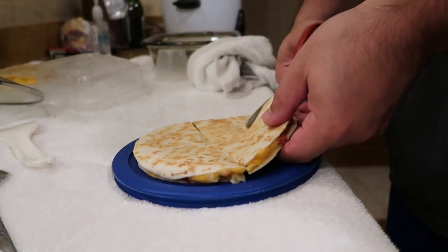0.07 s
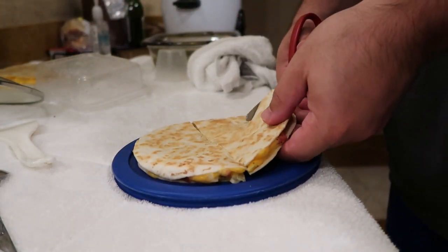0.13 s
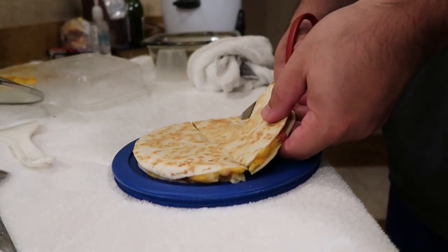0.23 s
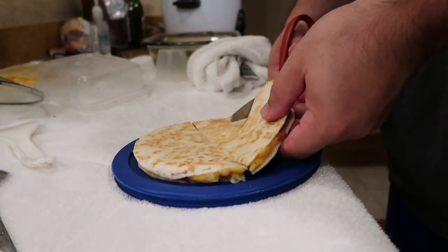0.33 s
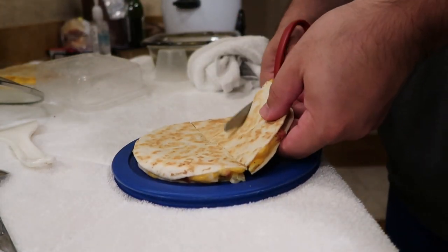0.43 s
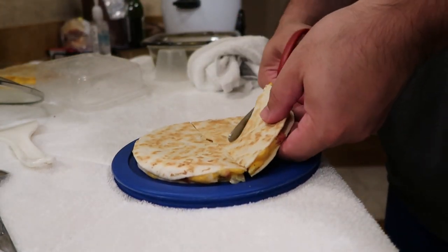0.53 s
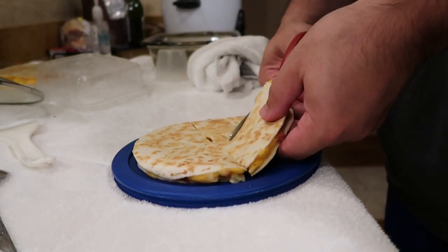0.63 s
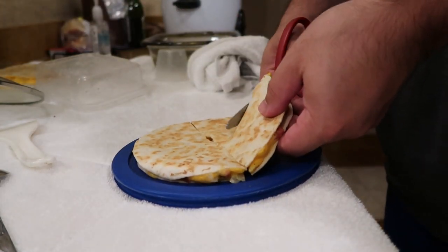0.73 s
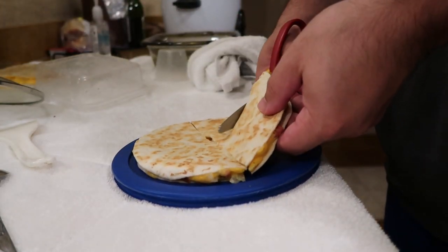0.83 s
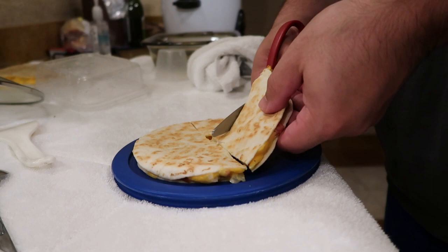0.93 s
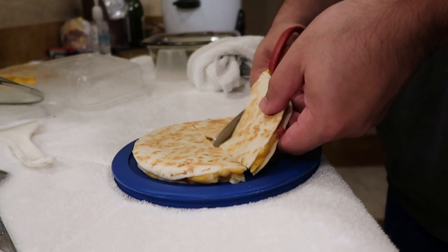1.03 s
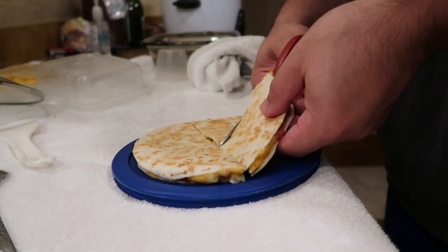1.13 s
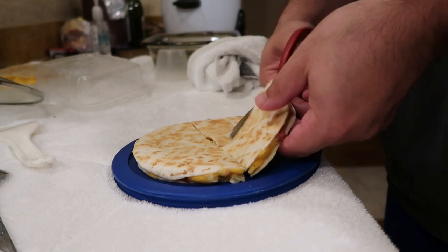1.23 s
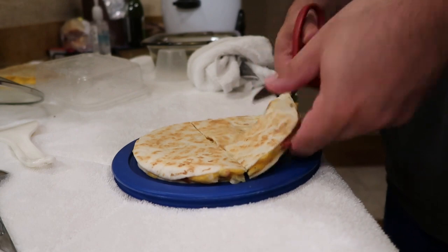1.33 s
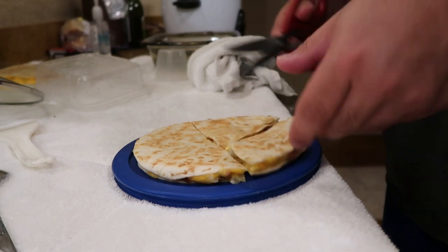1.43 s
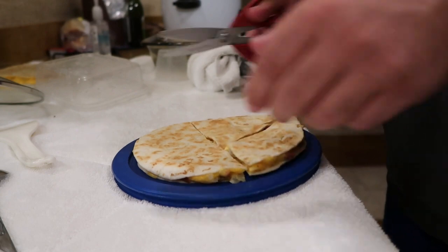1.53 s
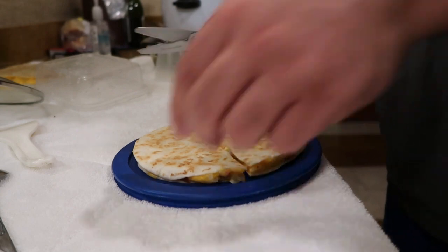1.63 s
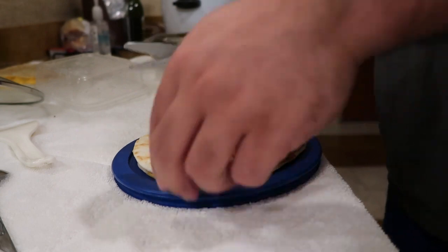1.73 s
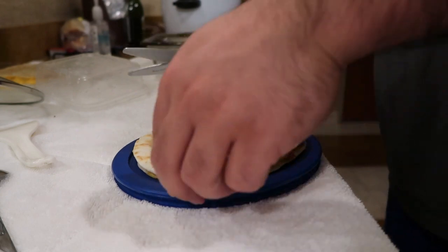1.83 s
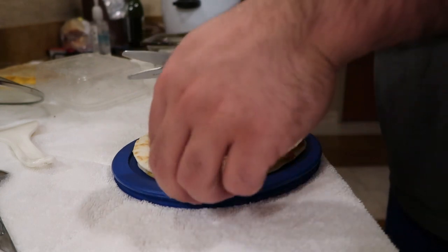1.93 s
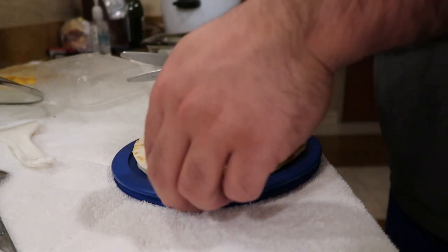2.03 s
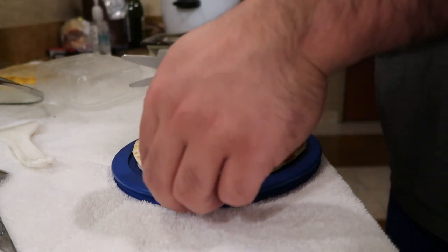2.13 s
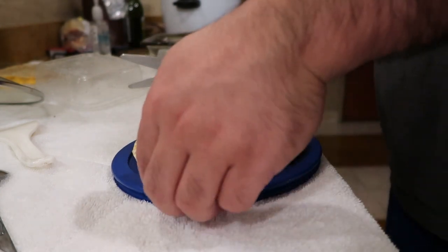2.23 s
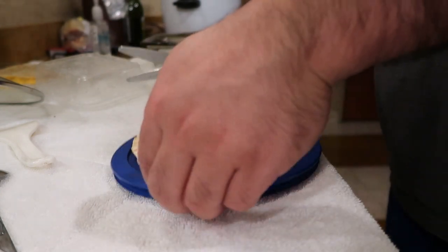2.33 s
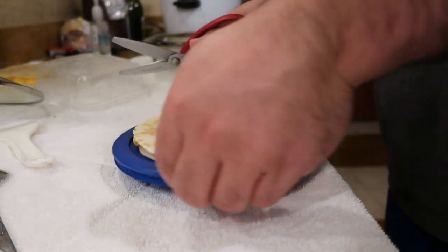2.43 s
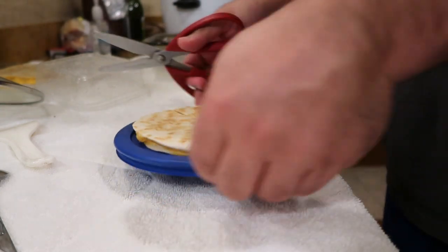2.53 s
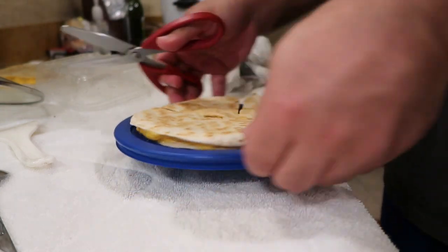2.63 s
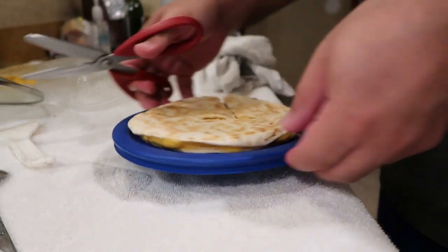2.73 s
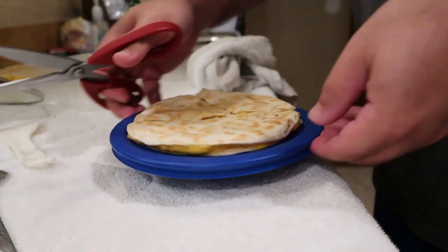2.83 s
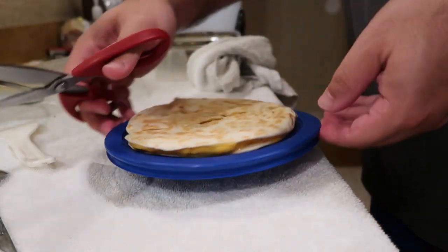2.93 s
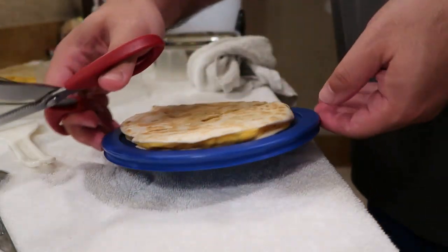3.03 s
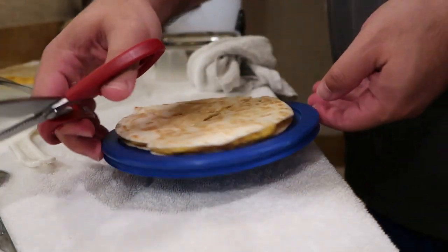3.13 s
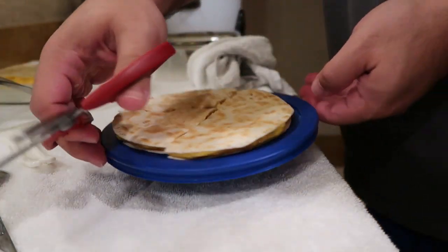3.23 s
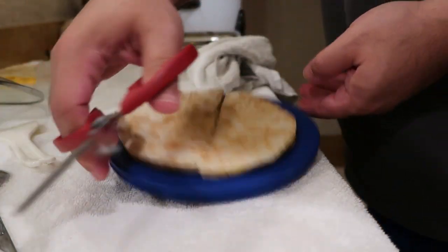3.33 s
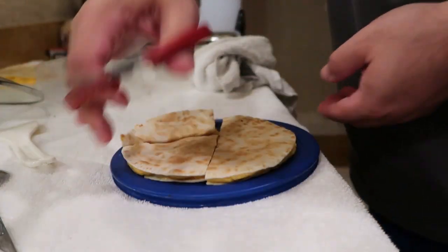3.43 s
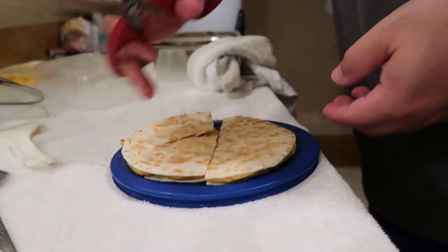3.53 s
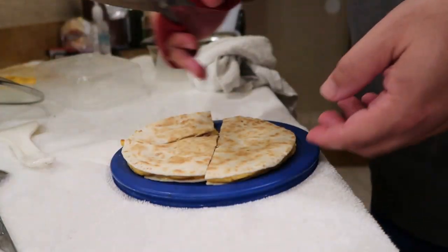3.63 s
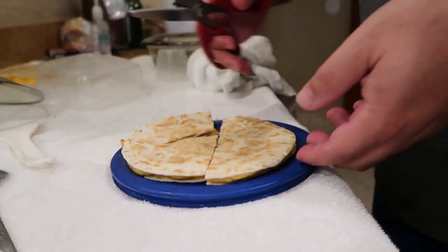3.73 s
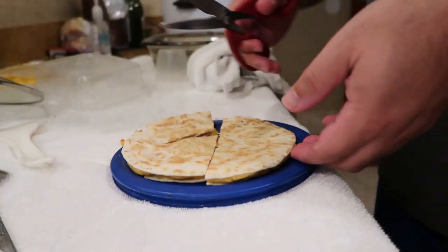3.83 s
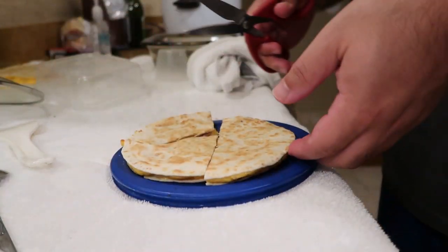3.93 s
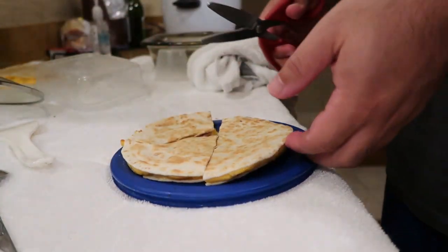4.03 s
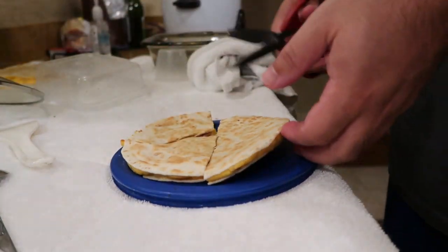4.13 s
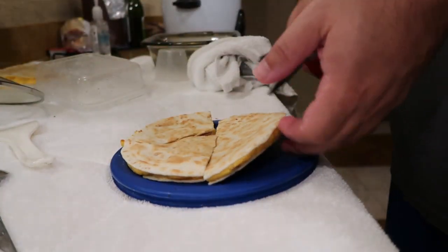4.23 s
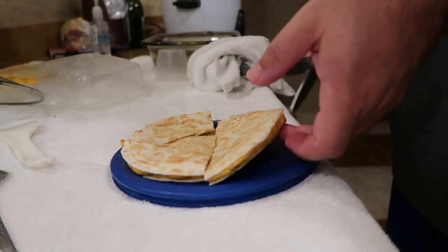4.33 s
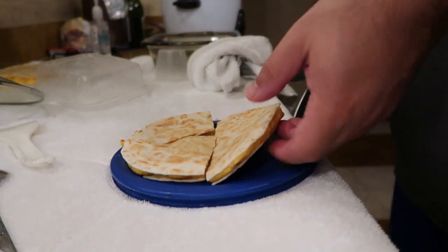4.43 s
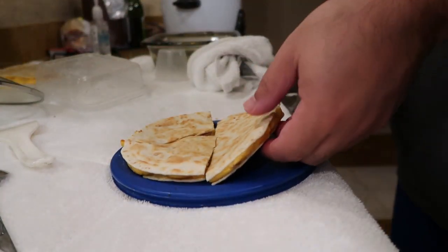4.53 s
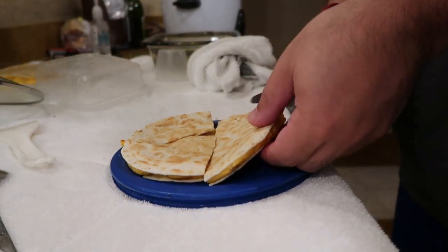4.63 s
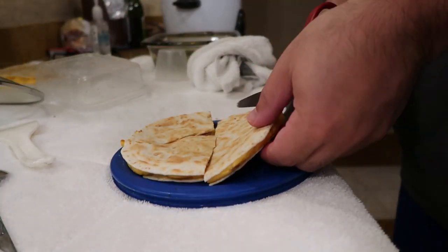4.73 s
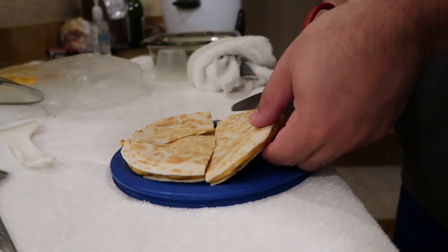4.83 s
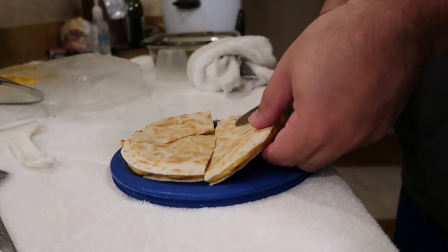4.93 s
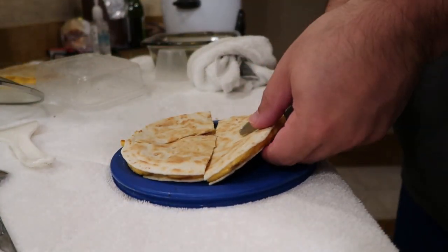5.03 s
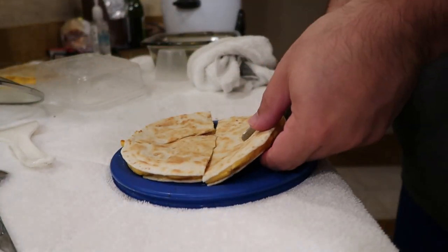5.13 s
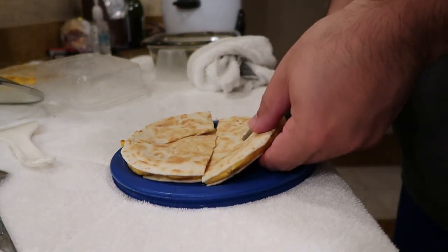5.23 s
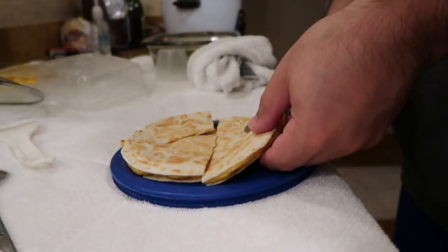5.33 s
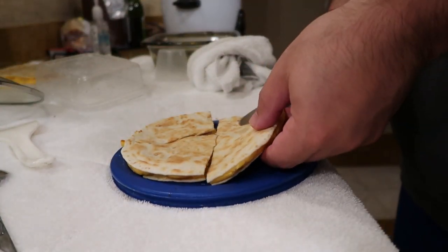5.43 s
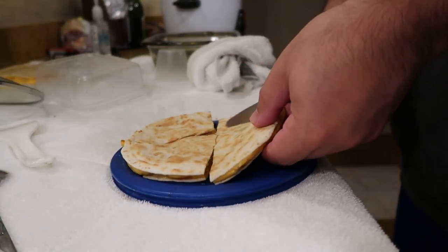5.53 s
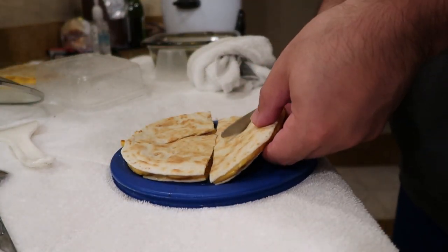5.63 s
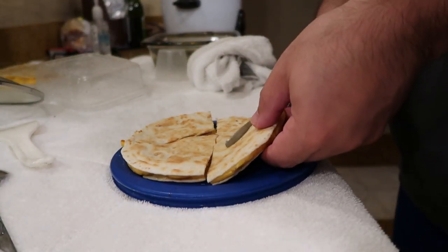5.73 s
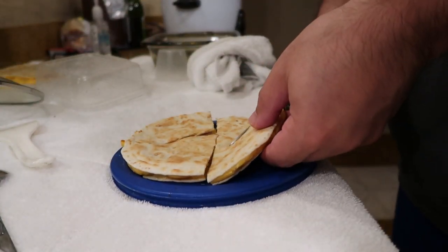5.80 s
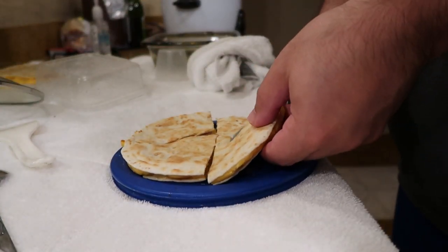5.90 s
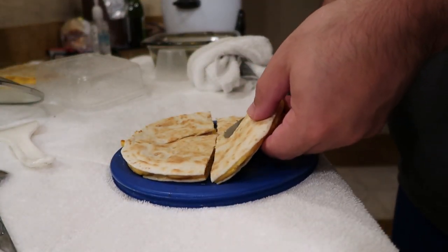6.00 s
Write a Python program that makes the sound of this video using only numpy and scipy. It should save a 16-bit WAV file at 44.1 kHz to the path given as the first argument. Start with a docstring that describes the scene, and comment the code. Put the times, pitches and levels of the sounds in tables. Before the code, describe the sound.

A steady low hum of appliances, with slightly wavering rumble, runs throughout in a small hard kitchen. Close stereo microphones hear the action a little to the right, with short bright echoes. At once a sharp metallic scissor snip cuts crisp crust; another comes at 0.7 s and the loudest at 1.2 s, each led by a brief rising crunch. Tiny dry cracks and soft plate taps fall between them, with a cluster of crackles and knocks at 1.4-1.5 s. A quiet lull follows. At 3.0 s the plastic plate is knocked, a very faint fuzzy whistle accompanies its turning, and at 3.5 s it lands with a loud hard clack, short rattle and low counter thud. From 3.8 s come light taps and faint crunching, with firmer knocks at 4.7 and 5.45 s and small cracks around 5.2 and 5.7 s. A bright snip rings at 5.9 s, then a last plate knock at 6.0 s.

```python
"""Crisp crust crunches and cracks, scissor blades snap shut and a plastic plate is knocked and set down.
Appliances hum in a small hard room. Blades, plate and flakes are damped modes struck by short contacts;
crunch, whistle and hum are shaped noise; the set-down adds low booming sines. A pair of microphone
ports places the hits to the right, and tails of noise echo them."""
import sys
import numpy as np
from scipy import signal
from scipy.fft import rfft, irfft
from scipy.io import wavfile

SR = 44100
rng = np.random.default_rng(int(sys.argv[2]) if len(sys.argv) > 2 else 0)


def pcm_store(signal):
    """Save signal as 16-bit PCM."""
    levels = np.round(np.clip(np.atleast_2d(signal), -1, 1) * 32767)
    wavfile.write(sys.argv[1], SR, levels.astype(np.int16).T)


def voltage_ratio(level):
    """Linear amplitude factor for a level in decibels (scalar or array-like)."""
    return 10 ** (np.asarray(level, float) / 20)


N = 267422  # length in samples, about six seconds

# Room noise falling to the treble. Each row: frequency in Hz, relative density in dB per Hz.
AIR_SPECTRUM = [(15, -46), (24, -34), (32, -8), (50, -6), (90, -5.5), (140, -7), (280, -16.5), (560, -20.5),
                (1000, -23.5), (2000, -29), (4400, -34), (8000, -43), (12500, -50.5), (15500, -55)]
# Humming of appliances. Each row: frequency in Hz, width in Hz, lift over the room noise in dB.
HUM_BANDS = [(36.3, 2.5, 7.5), (58.8, 4.6, 11), (75.6, 10.6, 6), (113, 2, 9.5), (166.6, 4.3, 11),
             (219, 45, 4.5), (394, 62, 10), (498, 12.3, 6), (633, 8, 8)]
# Left-right likeness of the diffuse hum. Each row: frequency in Hz, correlation from -1 to 1.
HUM_LIKENESS = [(25, 1), (60, .9995), (130, .98), (290, .82), (640, .61), (1410, .36), (3100, .29),
                (6820, -.02), (15000, -.33)]
AIR_DB = -41  # rms of the whole hum
WAVER_DB = 2  # rms waver of the lowest rumble, about once a second

# Fingers and blades working the food. Each row: start in seconds, length in seconds,
# level of the crunch in dB, level of the fine hiss of rubbed dry crust in dB.
HANDLING = [(0.28, 0.27, -61, -83), (0.863, 0.22, -61.5, -76), (1.35, 0.14, -55, -70),
            (1.518, .02, -50, -62), (2.897, 0.67, -62, -90), (3.451, 0.044, -49.5, -85),
            (3.481, 0.026, -33.5, -50.5), (3.8, 0.57, -65, -90), (4.55, 0.6, -61.5, -88),
            (5.132, 0.11, -51, -61.5), (5.288, 0.12, -61, -86), (5.624, 0.19, -58, -81),
            (5.698, 0.025, -58, -63)]
# Spectrum of the crunching crust. Each row: frequency in Hz, relative level in dB.
CRUST_SPECTRUM = [(500, 4), (1000, 4.5), (2000, -0.5), (3200, -2.5), (5000, -18), (7000, -18), (10000, -34)]
# Spectrum of the grainy noise just before each snap. Each row: frequency in Hz, relative level in dB.
LEAD_IN_SPECTRUM = [(700, -10), (1500, -4), (2800, 1), (4500, -7), (7000, -22), (10000, -35)]
# Spectrum of the dry hiss. Each row: frequency in Hz, relative level in dB.
DRY_SPECTRUM = [(3000, -20), (5000, -10), (8000, -13), (11000, -16), (14000, -14.5), (16000, -21)]
GRIP_S, LET_GO_S = 0.015, 0.022  # rise time and release time constant of handling
UNEVEN_DB = 1.5  # rms unevenness of the handling crunch
LEAD_IN_S, LEAD_IN_HISS_DB = .1, -11.5  # length of the rising noise before a snap, hiss relative to its grains

# Blades snapping shut. Each row: time in seconds, peak in dB, treble shine in dB,
# level that the noise just before the snap reaches in dB, its rise in dB per second.
SNIPS = [(0.0336, -14, 8, -49.5, 200), (0.682, -16, 9, -50, 73), (1.1959, -8, 11.5, -43.5, 300),
         (5.8786, -12.5, 6.5, -43.5, 400)]
# Steel modes of the scissors. Each row: frequency in Hz, width in Hz, relative level in dB.
STEEL_MODES = [(685, 230, -10), (1620, 500, -8.5), (1620, 570, -1), (2560, 2100, 6), (4380, 1200, 10.5),
               (5180, 2840, 6.5), (5500, 5000, -13), (6700, 2400, -11), (8300, 3400, 1.5),
               (11020, 1300, 11.5), (11680, 780, 11), (12400, 1800, -2)]
REBOUND_S, REBOUND_DB = .006, -12.5  # the handles bounce once

# Single cracks of the crust. Each row: time in seconds, peak in dB, pitch in Hz.
CRACKS = [(.157, -36, 3480), (0.641, -42, 3000), (0.6483, -32, 3070), (0.6609, -24.5, 3080),
          (1.095, -40.5, 3000), (1.4477, -27.5, 2700), (1.48, -35.5, 2400), (1.488, -39, 2400),
          (1.5278, -23, 3200), (3.424, -45, 4670), (3.575, -40, 3680), (5.172, -36, 3050),
          (5.225, -36, 3070), (5.71, -35.5, 3100), (5.804, -41, 3150)]

# Knocks on the plate. Each row: time in seconds, peak in dB, centre of the blow in Hz, spread in octaves,
# mode that cancels toward the microphone in Hz.
KNOCKS = [(.249, -40, 900, 0.86, 1200), (0.9099, -27.5, 900, 1.1, 1200), (1.3866, -34, 1570, 0.82, 1200),
          (1.4348, -33, 1200, 1.8, 1200), (1.5385, -31, 1500, 1.7, 1200), (3.029, -16.5, 1670, 0.83, 1200),
          (3.483, -29, 297, 0.59, 1620), (3.49, -20, 800, 0.89, 1620), (3.4958, -18.5, 2400, 1.23, 1620),
          (3.4979, -5, 1060, 0.86, 1620), (3.509, -26, 900, 1.3, 1620), (3.516, -23.5, 800, 1, 1620),
          (3.834, -37, 1200, 1.46, 1200), (3.882, -30.5, 930, 1.3, 1200), (4.231, -43, 1200, 1, 1200),
          (4.673, -26, 1030, 0.84, 1200), (5.156, -29, 1270, 0.91, 1200), (5.2676, -32.5, 1740, 1, 1200),
          (5.454, -21.5, 980, 1.23, 1200), (5.665, -31.5, 850, 0.61, 1200), (6.03, -22, 900, 1.3, 1620)]
# Plate modes. Each row: frequency in Hz, width in Hz, relative level in dB.
PLATE_MODES = [(251, 190, -1), (510, 217, 3), (705, 245, -0.5), (900, 295, 1), (1200, 360, -3),
               (1620, 330, -2.5), (2035, 340, -1.5), (2400, 290, -4.5), (2890, 350, -0.5),
               (3610, 380, -1.5), (4250, 400, -1.5), (5500, 650, -4), (6500, 690, -4)]
TOUCH_MS, RATTLE_MS = .033, 0.99  # spread of a touch on plastic, decay of the rattle
NULL_DB, NULL_WIDTH_HZ = -6, 166  # depth and half width of the cancellation

# A faint fuzzy whistle while plate or food is moved. Each row: start in seconds, length in seconds, level in dB.
WHISTLE = [(3.02, .45, -58), (4.6, .3, -66)]
WHISTLE_HZ = 1365
BROKEN_DB = 1.8  # rms unevenness of the whistle

# The loaded plate lands and the counter booms. Each row: frequency in Hz, peak in dB, decay in seconds.
THUD_MODES = [(115, -23, 0.0061), (40.4, -33, 0.106)]
THUD_S = 3.49

# The port pair for a source on the right. Each row: frequency in Hz, lead of the right port in radians,
# right over left in dB.
PORT_LEAD = [(100, 0, 0), (1000, .08, .3), (2600, .25, 1.5), (4100, .8, 2), (5700, 1.5, 1.5),
             (8000, 1.7, 1.5), (10000, 2.5, -2), (12000, 3.6, -4), (13500, 4.4, 0), (15000, 5.2, 1)]
# Decay of the room. Each row: frequency in Hz, time to fall 60 dB in seconds.
ROOM_DECAY = [(300, 0.61), (800, 0.47), (2100, 0.34), (5500, 0.35), (10000, 0.26), (15000, 0.15)]
# Left-right likeness of the echoes. Each row: frequency in Hz, correlation from -1 to 1.
ECHO_LIKENESS = [(100, .998), (640, .96), (1400, .96), (3100, .86), (5000, .35), (6800, -.1), (10000, -.65),
                 (15000, -.5)]
EDGE_HZ = 15900  # upper band limit of the mix


def evened(x):
    """Scales to rms 1."""
    return x / np.sqrt(np.mean(x ** 2) + 1e-20)


def read(points, hz):
    """Reads a table on a log-frequency axis."""
    f, value = np.transpose(points)
    return np.interp(np.log(hz + 1), np.log(f + 1), value)


def wander(s, slowest_hz, fastest_hz, count=20):
    """Slow chance of rms 1 from sines of random phase."""
    speeds = np.geomspace(slowest_hz, fastest_hz, count)
    return evened(sum(np.sin(2 * np.pi * (f * s + rng.random())) for f in speeds))


def add(mix, s, db, sound):
    """Lays a hit into the mix at time s with its peak at db."""
    part = mix[round(s * SR):][:len(sound)]
    part += voltage_ratio(db) * sound[:len(part)] / abs(sound).max()


def envelope(rows):
    """Gain over time from rows (start s, length s, dB): quick rise, hold, dying release."""
    t, gain = np.arange(N) / SR, np.zeros(N)
    for s, length, db in rows:
        rise = np.clip((t - s) / GRIP_S, 0, 1)
        release = np.exp(-np.maximum(t - s - length, 0) / LET_GO_S)
        gain += voltage_ratio(db) * rise * release
    return gain


def coloured(x, points):
    """Filters x by the spectrum of a table, then scales it to rms 1."""
    hz = np.fft.rfftfreq(len(x), 1 / SR)
    return evened(irfft(rfft(x) * voltage_ratio(read(points, hz)), len(x)))


def diffuse(size, length, likeness, db_of):
    """Two-channel noise from random short-time spectra, as alike as the table says, shaped by db_of(Hz, s)."""
    frames, hz = 4 * length // size + 5, np.fft.rfftfreq(size, 1 / SR)[:, None]
    a, b, c, d = rng.standard_normal((frames, len(hz), 4)).T
    left, other = a + 1j * b, c + 1j * d
    same = np.clip(read(likeness, hz), -1, 1)
    z = np.array([left, same * left + np.sqrt(1 - same ** 2) * other])
    z = z * voltage_ratio(db_of(hz, (np.arange(frames) * size / 4 / SR)[None]))
    return signal.istft(z, nperseg=size, noverlap=3 * size // 4)[1][:, :length]


def ring(modes, weight_db, contact):
    """A contact force sets damped modes ringing; neighbouring modes start in opposite directions."""
    hz, width, db = np.transpose(modes)[:, :, None]
    t, sign = np.arange(1300) / SR, (-1.) ** np.arange(len(modes))[:, None]
    strength = sign * voltage_ratio(db + weight_db(hz)) * width
    body = strength * np.exp(-np.pi * width * t) * np.sin(2 * np.pi * hz * t)
    return signal.fftconvolve(body.sum(0), contact)


def chatter(draw, ms, touch_ms):
    """Contact force: a click and a rattle of decay ms, even in colour; a longer touch is duller."""
    t_ms = np.arange(len(draw)) * 1000 / SR
    z = rfft((t_ms == 0) + draw * np.exp(-t_ms / max(ms, .1)), 4 * len(draw))
    even = irfft(z / abs(z))[:len(draw)]  # keeps the phases, levels the spectrum
    touch = np.exp(-.5 * (t_ms[:60] / touch_ms - 3) ** 2)
    return np.convolve(even, touch)


def hum():
    """Room noise falling to the treble, with narrow humming bands and a wavering rumble."""
    def db_of(hz, s):
        bands = sum(db / (1 + ((hz - f) / w) ** 2) for f, w, db in HUM_BANDS)
        waver = WAVER_DB * wander(s, 0.34, 1.58) / (1 + (hz / 110) ** 2)
        return read(AIR_SPECTRUM, hz) + bands + waver
    return voltage_ratio(AIR_DB) * evened(diffuse(8192, N, HUM_LIKENESS, db_of))


def crunch():
    """Dense small fractures of uneven size, a finer dry hiss, and a short rising noise just before each snap."""
    t, rows = np.arange(N) / SR, np.array(HANDLING)
    lead_in = np.zeros(N)
    for s, _, _, db, rise in SNIPS:
        lead_in += voltage_ratio(db - rise * abs(s - t)) * (t < s) * (t > s - LEAD_IN_S)
    uneven = voltage_ratio(UNEVEN_DB * wander(t, 5.5, 25))
    sizes = voltage_ratio(3.0 * np.minimum(rng.exponential(1, N), 3.5))
    grains = sizes * rng.standard_normal(N) * (rng.random(N) < 2500 / SR)  # about 2500 a second
    handled = coloured(grains, CRUST_SPECTRUM) * uneven * envelope(rows[:, :3])
    rising = coloured(grains, LEAD_IN_SPECTRUM) * lead_in
    hiss_gain = envelope(rows[:, [0, 1, 3]]) + voltage_ratio(LEAD_IN_HISS_DB) * lead_in
    return handled + rising + coloured(rng.standard_normal(N), DRY_SPECTRUM) * hiss_gain


def scissors():
    """The blades meet: a rattling contact rings the steel in a bright snap, then a weaker rebound."""
    out = np.zeros(N)
    for (s, db, shine_db, *_), draws in zip(SNIPS, rng.standard_normal((len(SNIPS), 2, 600))):
        def shine(hz):
            return shine_db * hz / (hz + 6000)
        for late, less_db, draw in zip((0, REBOUND_S), (0, REBOUND_DB), draws):
            contact = chatter(0.72 * draw, 2.3, 0.0115)
            add(out, s + late, db + less_db, ring(STEEL_MODES, shine, contact))
    return out


def cracks():
    """A flake breaks: a few cycles at its own pitch, with a lower and a higher mode beside it."""
    out = np.zeros(N)
    for (s, db, hz), draw in zip(CRACKS, rng.standard_normal((len(CRACKS), 300))):
        flake = [(0.67 * hz, 0.25 * hz, -6), (hz, 0.23 * hz, 0), (1.216 * hz, 0.4 * hz, -4)]
        add(out, s, db, ring(flake, np.zeros_like, chatter(0.53 * draw, 1.0, TOUCH_MS)))
    return out


def plate():
    """Each blow drives the modes near its own centre, soft blows low, nails and steel high.
    One mode cancels toward the microphone, yet the walls hear them all: returns (direct, all round)."""
    direct, around = np.zeros((2, N))
    for (s, db, hz0, octaves, null_hz), draw in zip(KNOCKS, rng.standard_normal((len(KNOCKS), 400))):
        contact = chatter(0.13 * draw, RATTLE_MS, TOUCH_MS)
        for out, null_db in (direct, NULL_DB), (around, 0):
            def blow(hz):
                null = null_db / (1 + ((hz - null_hz) / NULL_WIDTH_HZ) ** 4)
                return -6 * (np.log2(hz / hz0) / octaves) ** 2 + null
            add(out, s, db, ring(PLATE_MODES, blow, contact))
    return direct, around


def whistle():
    """A narrow band of noise with a weaker upper shoulder, flickering as it comes and goes."""
    offsets = [(-120, -40), (-35, -1), (30, -1), (70, -11), (200, -10), (350, -35)]  # Hz, dB
    band = [(WHISTLE_HZ + offset, db) for offset, db in offsets]
    broken = voltage_ratio(BROKEN_DB * wander(np.arange(N) / SR, 3.8, 30))
    return coloured(rng.standard_normal(N), band) * envelope(WHISTLE) * broken


def thud():
    """Low modes of the counter swell and die."""
    out, t = np.zeros(N), np.arange(SR) / SR
    for hz, db, decay in THUD_MODES:
        swell = 1 - np.exp(-t / 0.0044)
        add(out, THUD_S, db, swell * np.exp(-t / decay) * np.sin(2 * np.pi * hz * t))
    return out


def ports(x, sideways):
    """A source off to the right reaches the right microphone port first; the housing shades the treble."""
    hz, (f, lead, right_db) = np.fft.rfftfreq(N, 1 / SR), np.transpose(PORT_LEAD)
    turn = np.exp(.5j * sideways * np.interp(hz, f, lead))
    half = turn * voltage_ratio(.5 * sideways * np.interp(hz, f, right_db))  # half the difference to each port
    return irfft(rfft(x) * np.array([1 / half, half]), N)


def room(x, db, count=3):
    """Echoes from counter and walls, each band dying at its own speed, faster at first.
    The sound fades slowly and steadily between several noise tails, which keeps the echoes from sounding striped."""
    out, t = np.zeros((2, N)), np.arange(N) / SR
    tail_t = np.arange(SR // 2) / SR

    def decay_db(hz, s):
        return -60 * s / read(ROOM_DECAY, hz) + 11.6 * np.exp(-s / 0.0091)
    for k in range(count):
        tail = diffuse(128, SR // 2, ECHO_LIKENESS, decay_db)
        tail = tail * np.clip((tail_t - .003) / 0.00091, 0, 1)  # silent for the first 3 ms
        share = np.sqrt(2 / count) * np.cos(np.pi * (t / 1.9 + k / count))
        out += signal.fftconvolve((x * share)[None], tail / np.linalg.norm(tail[0]), axes=1)[:, :N]
    return voltage_ratio(db) * out


def scene():
    """Direct sounds at the port pair, the thud, the echoes and the hum."""
    steel, food = scissors(), crunch() + cracks() + whistle()
    dish, dish_around = plate()
    direct = ports(steel, 1) + ports(dish, 0.56) + ports(food, 0.61) + thud()
    echoes = room(steel, -3.0) + room(dish_around, -5.5) + room(food, -5.0)
    return direct + echoes + hum()


def top_cut(x):
    """Nothing passes above the cut-off."""
    return signal.sosfilt(signal.butter(12, 16470, fs=SR, output="sos"), x)


def record(dry):
    """Limits the band at the top and finishes the mix."""
    limited = signal.oaconvolve(dry, signal.firwin(255, EDGE_HZ, fs=SR)[None], "same")
    return top_cut(limited)


dry = scene()
out = record(dry)
pcm_store(out)
```